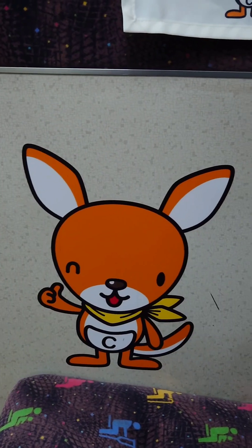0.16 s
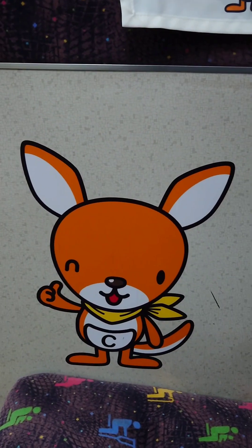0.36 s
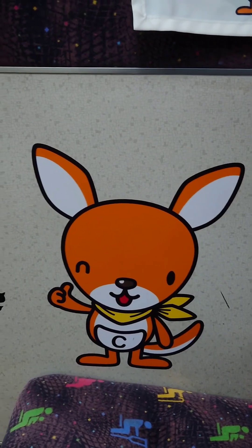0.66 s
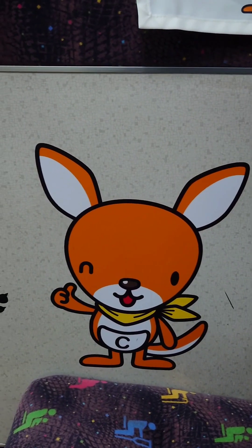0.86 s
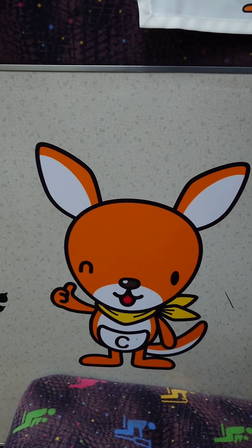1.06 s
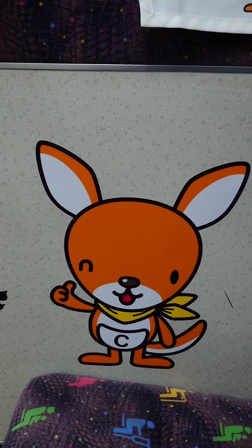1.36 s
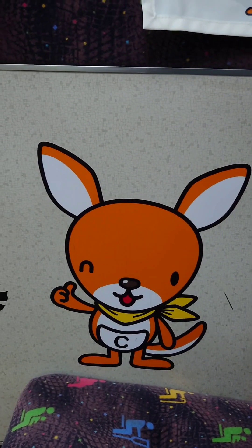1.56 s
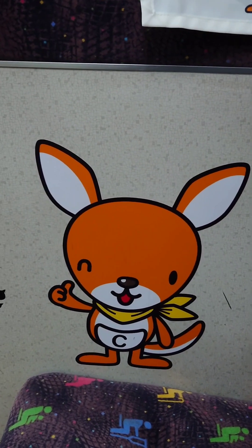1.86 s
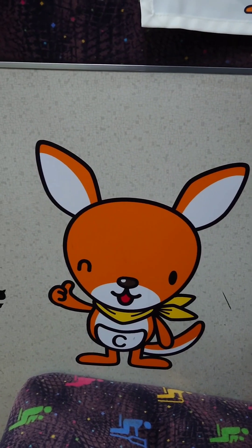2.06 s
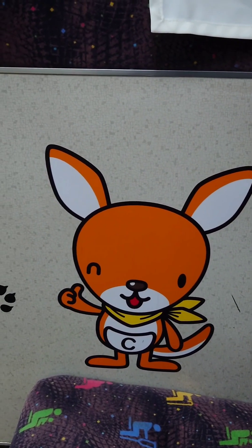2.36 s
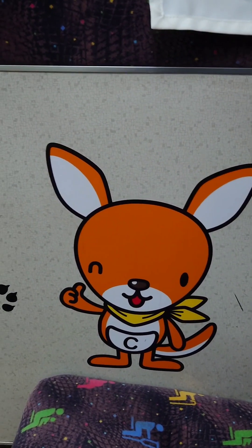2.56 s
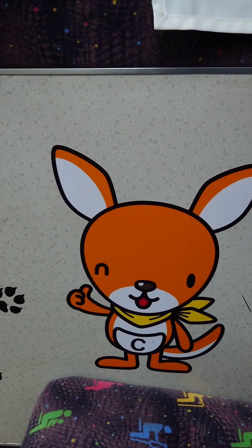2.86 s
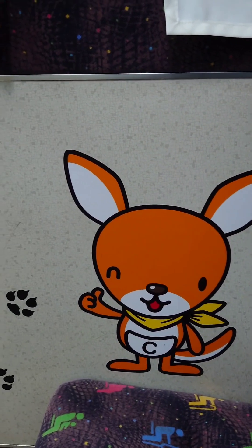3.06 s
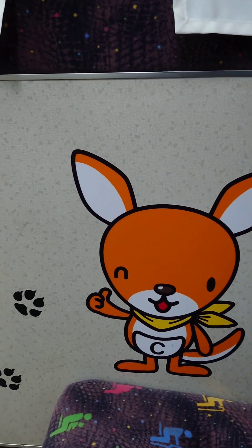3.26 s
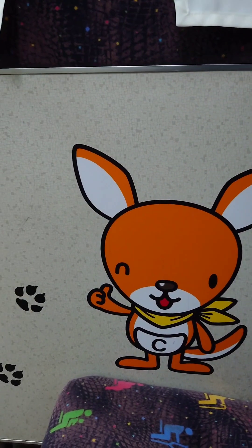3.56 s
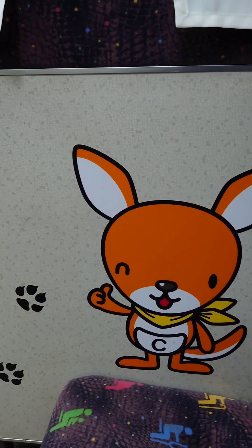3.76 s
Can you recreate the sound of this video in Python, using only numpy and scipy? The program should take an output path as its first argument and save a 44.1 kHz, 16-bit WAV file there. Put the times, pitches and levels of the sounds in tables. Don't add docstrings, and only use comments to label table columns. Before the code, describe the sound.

A diesel railcar engine drones low and steady inside the passenger cabin, over rolling wheel rumble and soft ventilation air. A dull knock comes early, then deep rail-joint thuds midway and near the end, in close stereo.

```python
import sys
import numpy as np
from scipy import signal
from scipy.io import wavfile
from scipy.ndimage import uniform_filter1d

SR = 44100
rng = np.random.default_rng(int(sys.argv[2]) if len(sys.argv) > 2 else 0)


def rack_gain(trim_db):
    fader = np.asarray(trim_db, float)
    return 10 ** (fader / 20)


def transcribe(signal):
    frames = np.atleast_2d(signal).T
    limited = np.clip(frames, -1, 1)
    pcm = np.round(limited * 32767).astype(np.int16)
    wavfile.write(sys.argv[1], SR, pcm)


N = 171990


def evened(x):
    return x / np.sqrt(np.mean(x ** 2) + 1e-20)


def read(points, hz):
    f, value = np.transpose(points)
    return np.interp(np.log(hz + 1), np.log(f + 1), value)


def add(mix, s, sound):
    part = mix[:, round(s * SR):][:, :sound.shape[1]]
    part += sound[:, :part.shape[1]]


def slow(t, top_hz):
    rates = np.geomspace(top_hz / 16, top_hz, num=24)
    return evened(sum(np.sin(2 * np.pi * (f * t + rng.random())) / np.sqrt(f) for f in rates))


def noise(shape, length, size, patchy_db=0., flicker_db=0., swing=None):
    # f/Hz, likeness (1 = same)
    likeness = [(60, 0.99), (130, 0.93), (290, 0.87), (640, 0.48), (1410, -0.031), (3100, -0.19),
                (6820, -0.011), (15000, 0.019)]
    # f/Hz, left minus right/dB
    balance = [(60, -1), (130, 4.5), (290, -1.5), (640, 1.5), (1410, 1.5), (3100, -3), (6820, 1),
               (15000, 2.0)]
    frames = 4 * length // size + 5
    hz = np.fft.rfftfreq(size, 1 / SR)
    t = np.arange(frames) * size / 4 / SR
    a, b, c, d, patches = rng.standard_normal((frames, len(hz), 5)).T
    patches = uniform_filter1d(patches, size=10, axis=0)
    patches = evened(uniform_filter1d(patches, size=12, axis=1))
    level = shape(hz)[:, None] + patchy_db * patches + flicker_db * slow(t, top_hz=40)
    if swing is not None:
        level = level + swing(hz, t)
    same = np.clip(read(likeness, hz), -1, 1)[:, None]
    lean = rack_gain(read(balance, hz) / 2)[:, None]
    left = a + 1j * b
    right = same * left + np.sqrt(1 - same ** 2) * (c + 1j * d)
    spectra = np.array([lean * left, right / lean]) * rack_gain(level)
    sound = signal.istft(spectra, nperseg=size, noverlap=3 * size // 4)[1]
    return evened(sound[:, :length])


def blow(t, rise, t60):
    return (1 - np.exp(-t / rise)) ** 2 * rack_gain(-60 * t / t60)


def hiss():
    # f/Hz, level/dB per Hz
    hiss_spectrum = [(7000, -30), (8000, -9), (8400, -13), (9600, -14), (10200, 0), (12500, -2),
                     (15000, -1)]
    return rack_gain(-66.5) * noise(lambda hz: read(hiss_spectrum, hz), N, size=512, patchy_db=.8, flicker_db=.3)


def bumps(hz):
    # f/Hz, width/Hz, lift/dB
    resonances = [(223, 26, -6), (345, 14, 2), (665, 8.3, 6), (930, 28, 4.5), (1466, 19, 5),
                  (2165, 40, 4.5), (2767, 23, 1), (2960, 80, 4.5), (4360, 98, 3.5)]
    return sum(db / (1 + (2 * (hz - f) / width) ** 2) for f, width, db in resonances)


def cabin():
    # f/Hz, level/dB per Hz
    roar_spectrum = [(150, -46), (200, -7.5), (350, -1), (560, -8), (1000, -7.5), (1150, -11.5),
                     (1750, -16.5), (2600, -17.5), (3600, -55)]
    # f/Hz, level/dB per Hz
    air_spectrum = [(2000, -17.5), (2700, -2), (3300, -4.5), (4300, -7.5), (5300, -11), (6800, -12),
                    (7800, -17.5), (8500, -44)]
    # t/s, level/dB
    swell_points = [(0, 1.15), (.5, -0.17), (1., -0.5), (2.8, -0.74), (3.9, 0)]
    s, db = np.transpose(swell_points)
    swell = rack_gain(np.interp(np.arange(N) / SR, s, db))
    roar = noise(lambda hz: read(roar_spectrum, hz) + bumps(hz), N, size=2048, patchy_db=0.5, flicker_db=.5)
    air = noise(lambda hz: read(air_spectrum, hz) + bumps(hz), N, size=512, patchy_db=.8, flicker_db=.25)
    return swell * (rack_gain(-39.5) * roar + rack_gain(-54) * air)


def whine():
    # f/Hz, level/dB
    whine_tones = [(3749, -83), (4284, -78), (6427, -85), (6476, -85), (6511, -81), (6601, -83),
                   (6828, -85), (6916, -80), (7004, -82), (7452, -89), (7498, -85), (7581, -87),
                   (7625, -89)]
    wander_hz = 3
    t = np.arange(N) / SR
    drift = lambda: np.interp(t, t[::512], slow(t[::512], top_hz=5))
    wander = np.cumsum(wander_hz * drift()) / SR

    def tone(hz, db):
        loudness = rack_gain(db + 3 + 1.5 * drift())
        return loudness * np.sin(2 * np.pi * (hz * t + wander + rng.random()))

    return np.array([sum(tone(hz, db) for hz, db in whine_tones) for port in range(2)])


def ticks():
    # t/s, level/dB, f/Hz, left minus right/dB
    tick_events = [
        (0.1166, -55.5, 14400, 6.5),
        (0.3072, -56, 11400, 9),
        (0.3556, -40.5, 14500, 4.5),
        (3.5977, -47, 12500, 3.5),
        (3.6855, -56.5, 12100, 1),
        (3.7046, -52, 12400, -3),
        (3.8566, -50.5, 12500, 2),
    ]
    width_hz, t60, tail_db, tail_t60 = 1900, .02, -14, .12
    out, t = np.zeros((2, N)), np.arange(SR // 3) / SR
    for s, db, pitch_hz, pan_db in tick_events:
        def spectrum(hz):
            peak = np.maximum(-6 * ((hz - pitch_hz) / width_hz) ** 2, -16.)
            return peak - 40 * (hz < 3000)

        ring = noise(spectrum, len(t), size=256)
        shape = blow(t, .0006, t60) + rack_gain(tail_db) * blow(t, .003, tail_t60)
        add(out, s, rack_gain(db - 2.0) * ring * shape * rack_gain([[pan_db / 2], [-pan_db / 2]]))
    return out


def knocks():
    # t/s, level/dB, brightness (0-1)
    knock_events = [(.077, -49, .5), (.927, -48, .3), (1.303, -32.5, .15), (1.36, -47, .8),
                    (1.483, -39, .45), (1.55, -49, .9), (3.02, -49, .7), (3.11, -42, .1), (3.21, -41, 0.),
                    (3.522, -47, 1.), (3.596, -46, 1.), (3.69, -49, .8), (3.75, -41, .1), (3.856, -49, 1.)]
    # f/Hz, level/dB
    dull = [(180, -16), (420, 0), (1050, -3), (1350, -14), (4000, -28)]
    # f/Hz, level/dB
    hard = [(300, -12), (1000, -8), (2600, -6), (4000, -14), (8000, -30)]
    rise_s, t60 = .012, .4
    out, t = np.zeros((2, N)), np.arange(SR // 3) / SR
    for s, db, bright in knock_events:
        def spectrum(hz):
            soft_part = (1 - bright) * read(dull + [(12000, -84)], hz)
            hard_part = bright * read(hard + [(14000, -67)], hz)
            return soft_part + hard_part - 60 * (hz < 150)

        body = noise(spectrum, len(t), size=256)
        shape = blow(t, rise_s * (1 - .75 * bright), t60 * (1 - .4 * bright))
        add(out, s, rack_gain(db + 3.5) * body * shape)
    return out


def thuds():
    # t/s, level/dB, f/Hz
    thud_events = [
        (1.328, -34, 69.5),
        (2.422, -18.5, 44.5),
        (2.571, -15.5, 64.6),
        (3.6, -28, 33.),
        (3.708, -17, 60.2),
    ]
    rise_s, t60, overtone, overtone_db = 0.021, 0.29, 1.45, -9
    out, t = np.zeros((2, N)), np.arange(SR // 3) / SR
    for s, db, hz in thud_events:
        ring = np.sin(2 * np.pi * hz * t)
        ring = ring + rack_gain(overtone_db) * np.sin(2 * np.pi * overtone * hz * t)
        add(out, s, rack_gain(db) * 2 * blow(t, rise_s, t60) * ring * np.ones((2, 1)))
    return out


def bogies():
    # f/Hz, level/dB per Hz
    rumble = [(8, -6.5), (17, 3.5), (24, -8.5), (45, -16), (100, -15), (120, -21.5), (185, -29.5),
              (320, -45.5)]
    # t/s, level/dB
    ride = [(0.0, -23), (0.03, -39.5), (0.3, -27), (1.35, -45), (1.39, -29), (2.26, -36.5), (2.66, -25),
            (3.06, -40), (3.32, -38), (3.36, -38.5), (3.68, -26.5), (3.73, -32.5), (3.81, -29.5),
            (3.9, -53.5)]
    # f/Hz, share (0-1)
    ride_share = [(18, 0.83), (40, 0.2), (100, 0.35)]
    s, db = np.transpose(ride)
    swing = lambda hz, t: read(ride_share, hz)[:, None] * (np.interp(t, s, db) - db.mean())
    return rack_gain(-27) * noise(lambda hz: read(rumble + [(1000, -100)], hz), N, size=4096, swing=swing)


def engine():
    orders = [2, 4, 5, 6, 7, 8, 9, 10, 11, 12, 15, 18, 20, 26]
    # early, middle, late, last moments (level/dB)
    order_levels = [(-34, -36, -34, -36), (-44, -43, -42, -41), (-43, -41, -37, -38), (-48, -48, -37, -35),
                    (-43, -41, -41, -46), (-37, -37, -39, -52), (-35.5, -32.5, -33, -38),
                    (-59, -59, -53, -55), (-48, -50, -50, -60), (-37.5, -39, -41.5, -45),
                    (-62, -61, -59, -58), (-65, -60, -60, -67), (-60, -59, -58, -56), (-59, -58, -58, -57)]
    stages = [.4, 1.9, 3.05, 3.6]
    start_hz, end_hz = 13.475, 13.985
    waver_db, port_lag_s = .7, .0004
    pulse_place = .363
    floor_order, floor_lag = 7.5, .4
    t = np.arange(N) / SR
    coarse = t[::256]
    rate = np.linspace(start_hz, end_hz, N)
    port_shift = np.array([[-.5], [.5]]) * port_lag_s * rate
    turns = np.cumsum(rate) / SR - pulse_place + port_shift
    hum = np.zeros((2, N))
    for k, db in zip(orders, order_levels):
        level = np.interp(coarse, stages, db) + waver_db * slow(coarse, top_hz=9.4)
        lag = floor_lag * (k < floor_order)
        hum += rack_gain(np.interp(t, coarse, level)) * np.cos(2 * np.pi * (k * turns - lag))
    return np.sqrt(2) * hum


def scene():
    background = hiss() + cabin() + whine()
    jolts = ticks() + knocks() + thuds()
    return background + jolts + bogies() + engine()


def low_pass(x):
    return signal.sosfilt(signal.butter(12, 16720, fs=SR, output="sos"), x)


def record(dry):
    low_cut_hz, edge_hz = 1.76, 15760
    start_share, fade_s = 0.9, 0.0034
    cut = signal.sosfilt(signal.butter(1, low_cut_hz, "high", fs=SR, output="sos"), dry)
    band_limit = signal.firwin(511, edge_hz, window=("kaiser", 9), fs=SR)
    cut = signal.oaconvolve(cut, band_limit[None], "same")
    mix = cut * np.minimum(start_share + np.arange(N) / (fade_s * SR), 1)
    return low_pass(mix)


dry = scene()
out = record(dry)
transcribe(out)
```